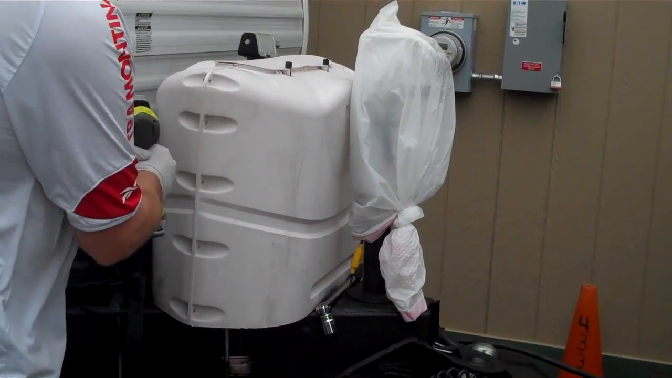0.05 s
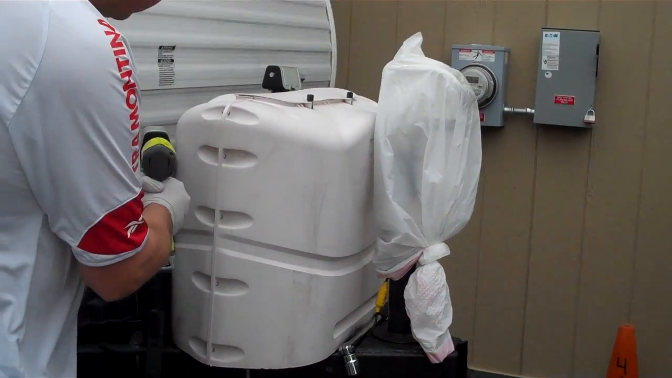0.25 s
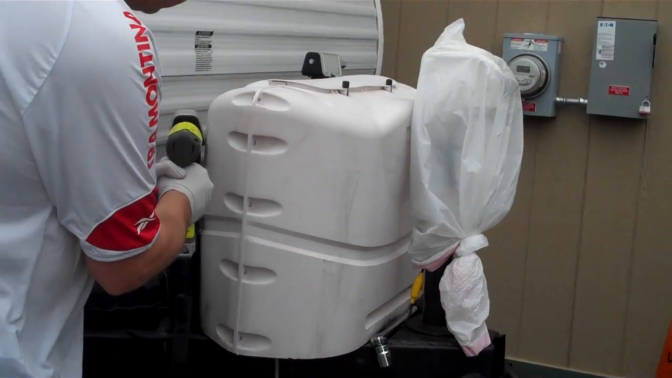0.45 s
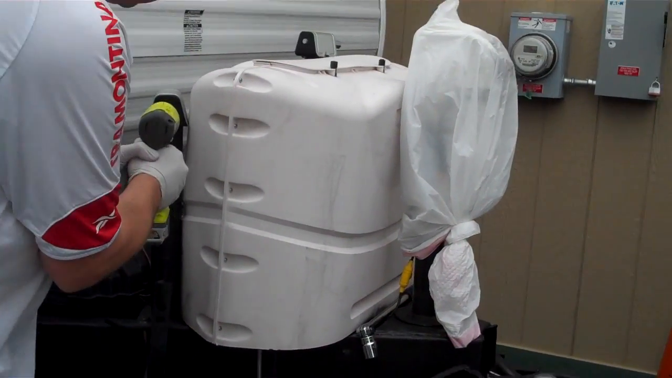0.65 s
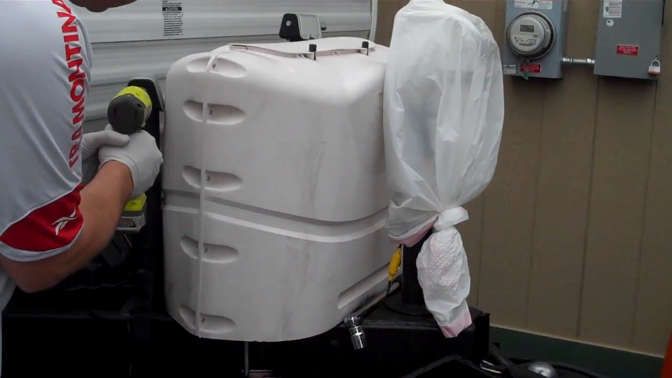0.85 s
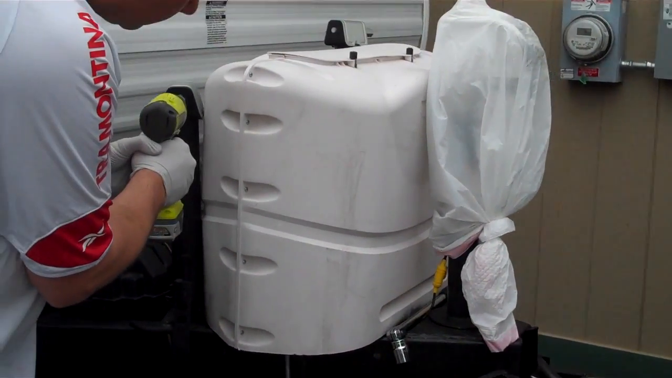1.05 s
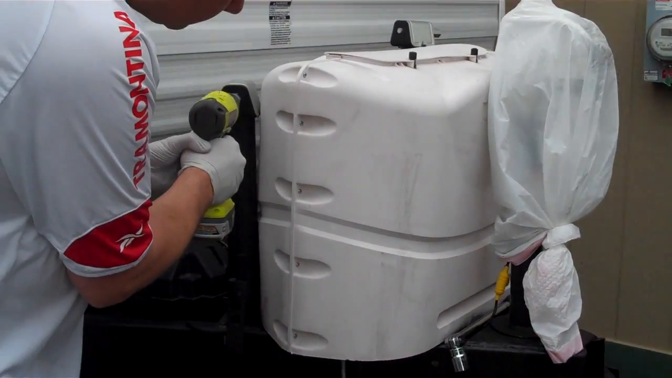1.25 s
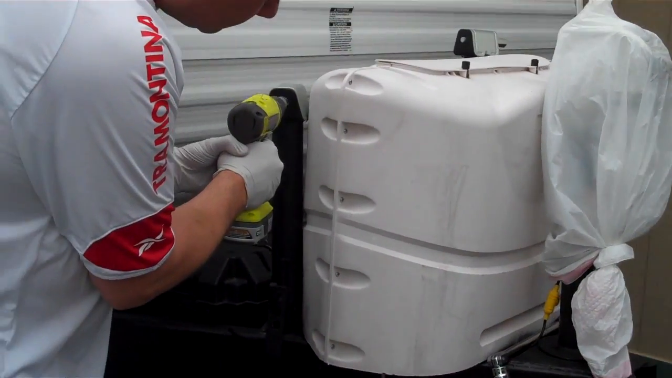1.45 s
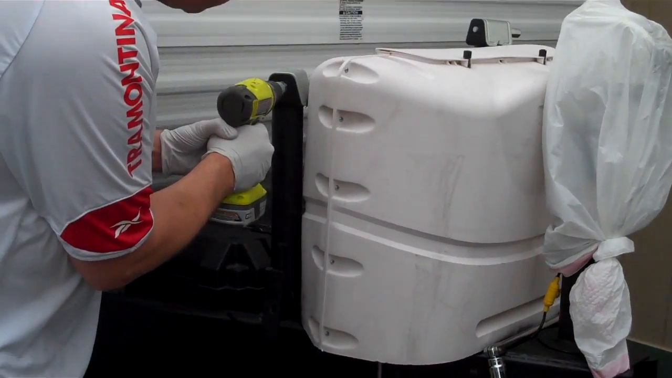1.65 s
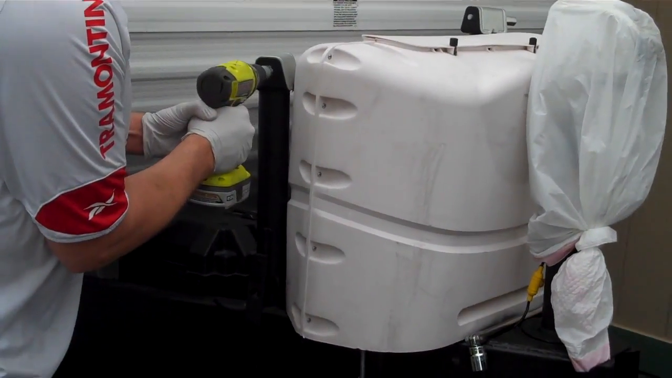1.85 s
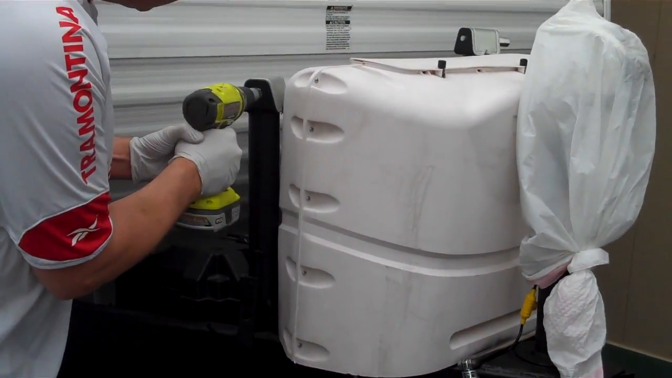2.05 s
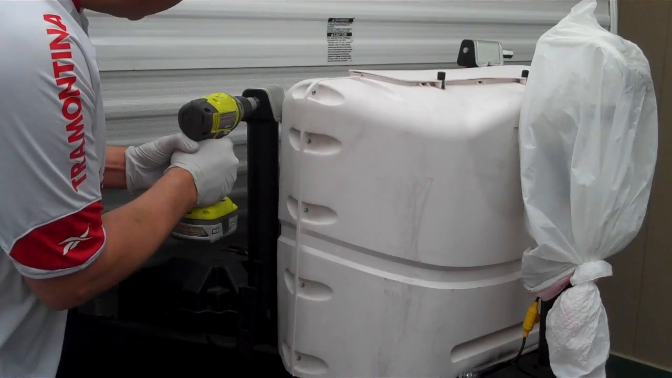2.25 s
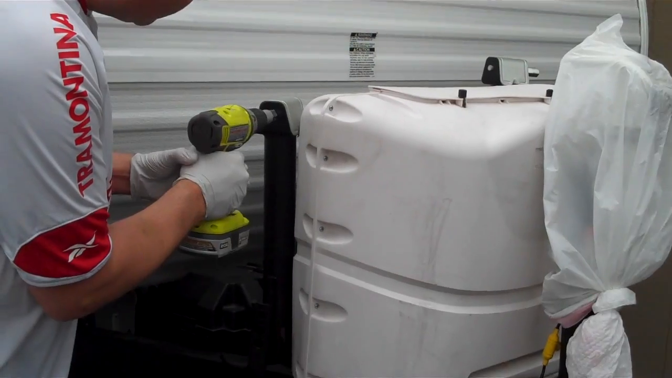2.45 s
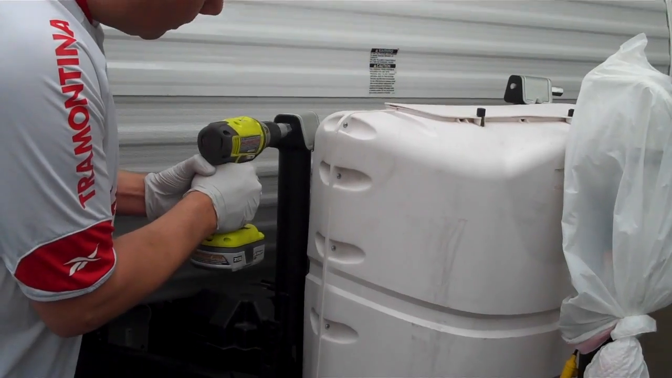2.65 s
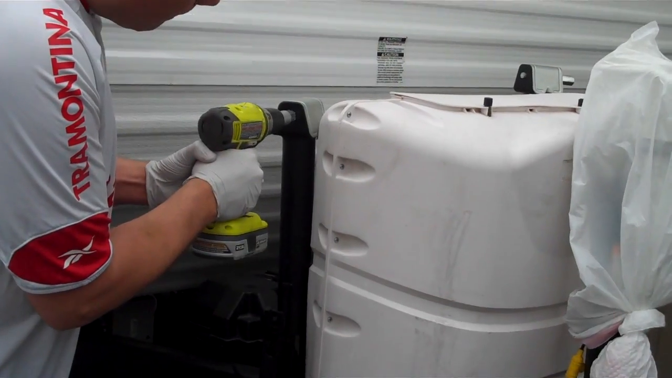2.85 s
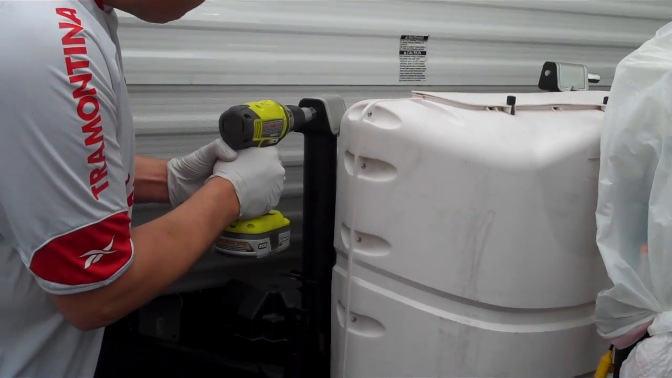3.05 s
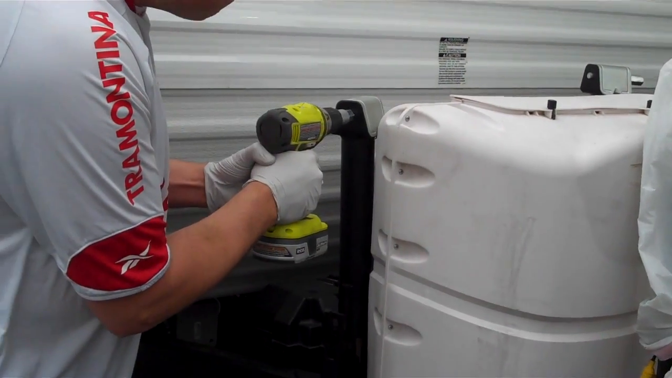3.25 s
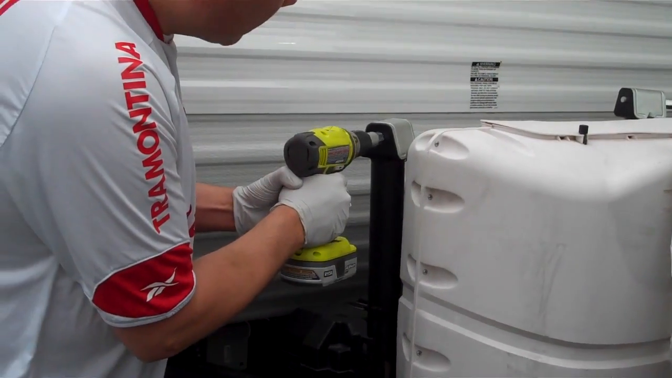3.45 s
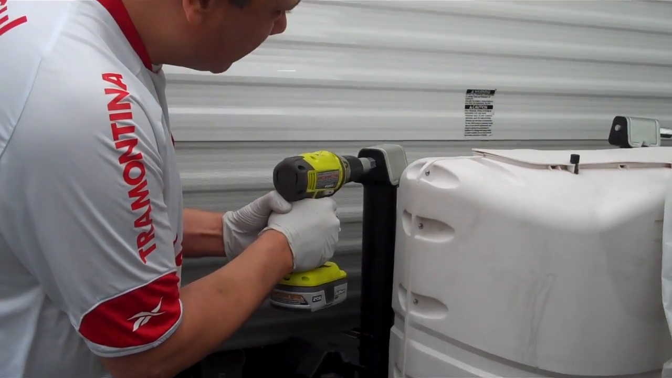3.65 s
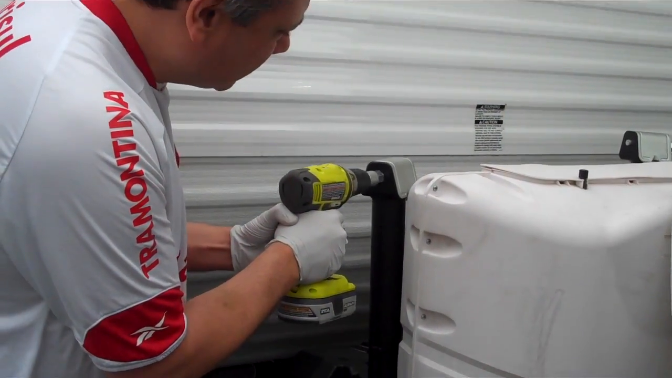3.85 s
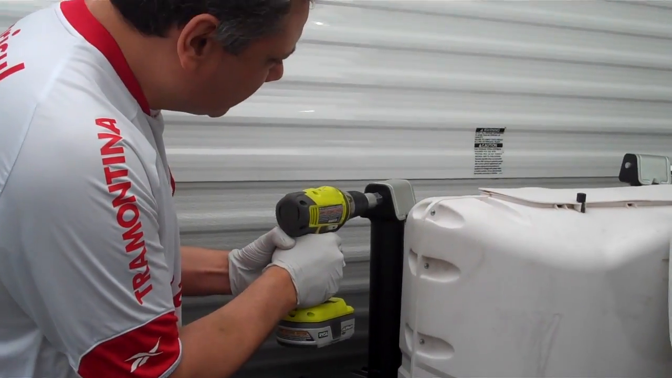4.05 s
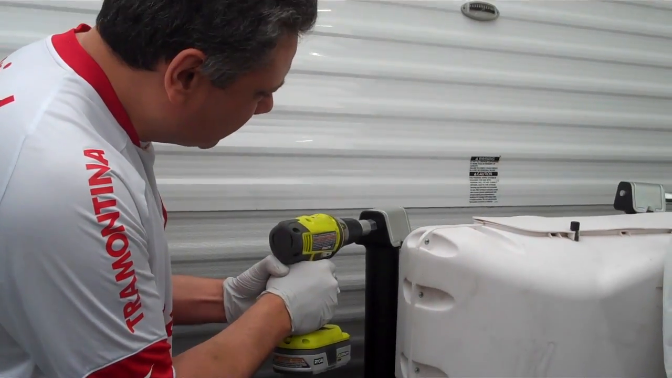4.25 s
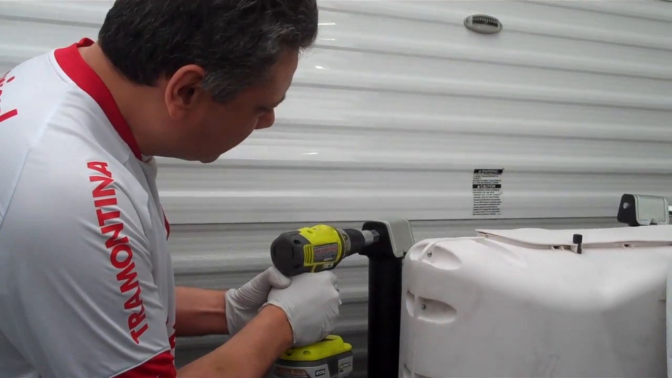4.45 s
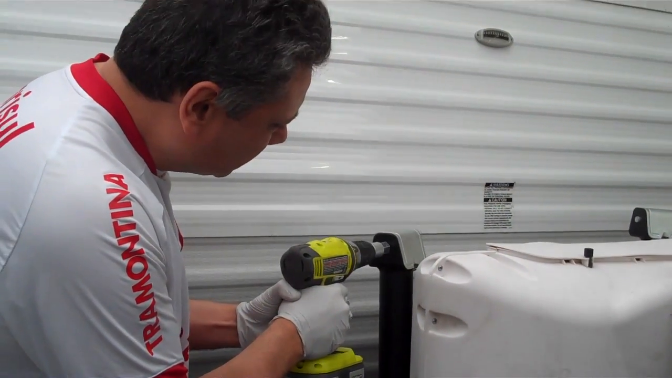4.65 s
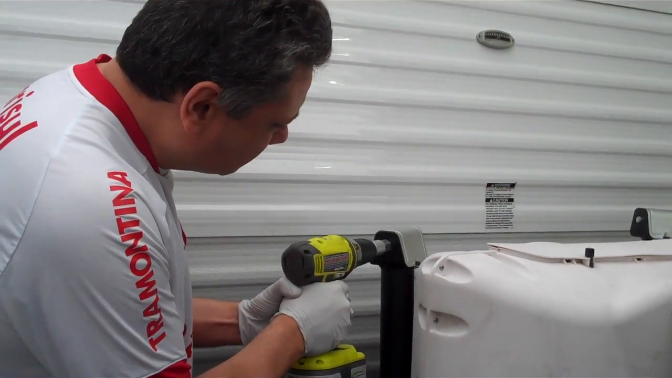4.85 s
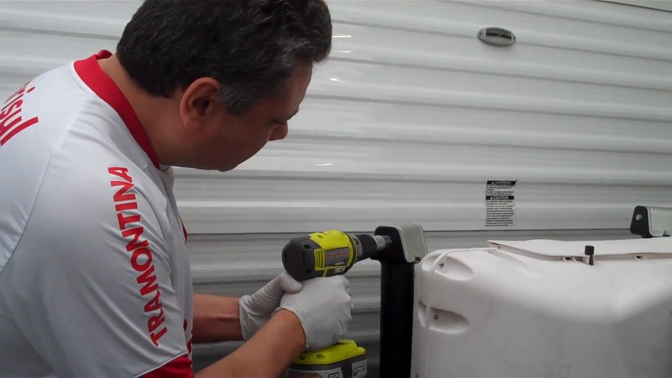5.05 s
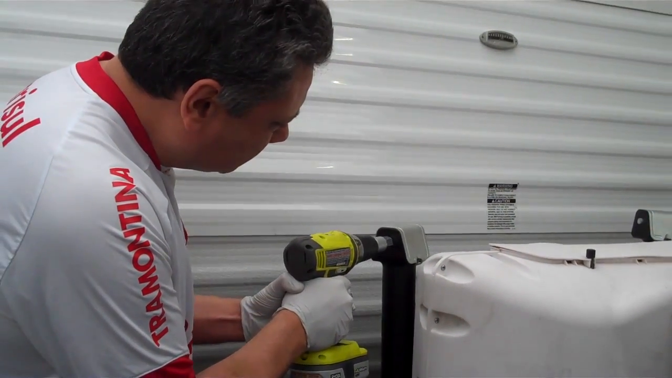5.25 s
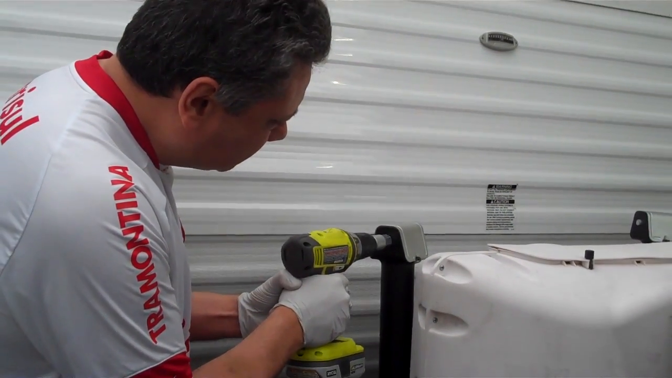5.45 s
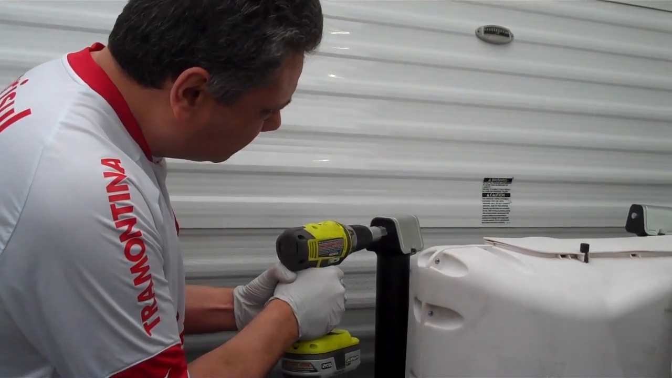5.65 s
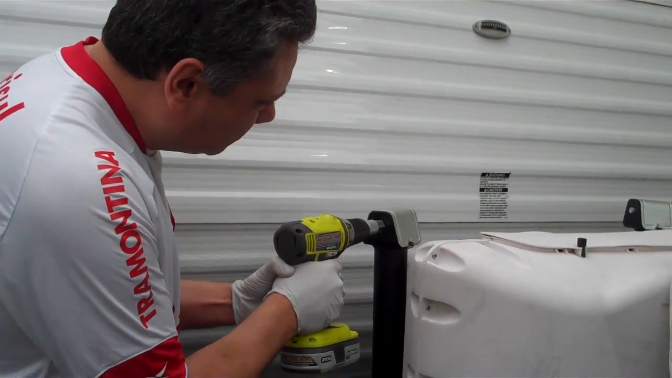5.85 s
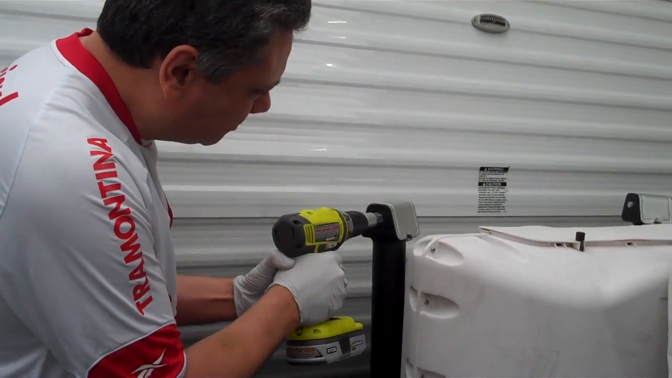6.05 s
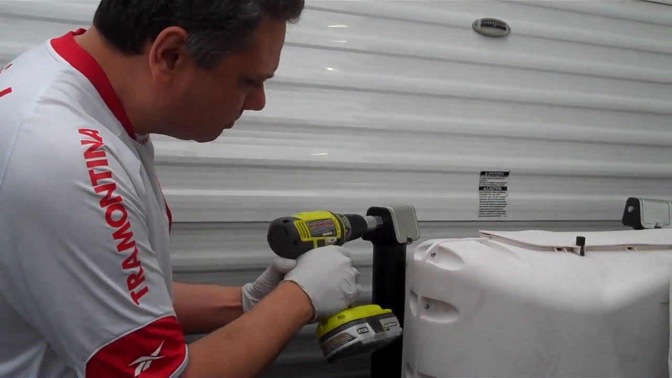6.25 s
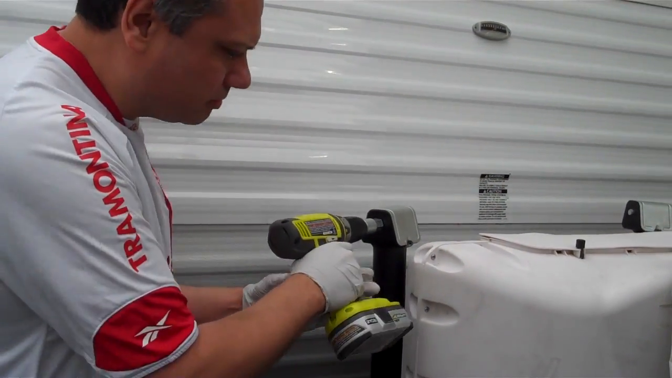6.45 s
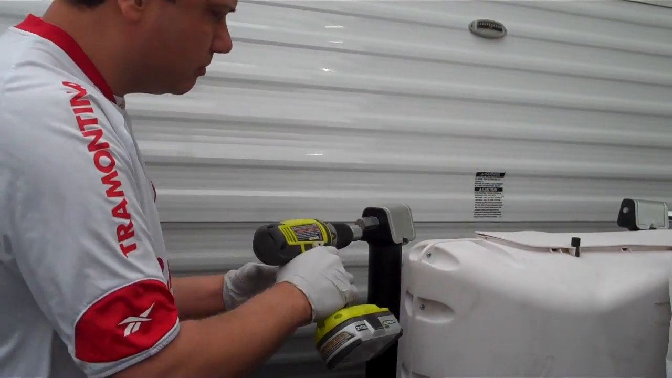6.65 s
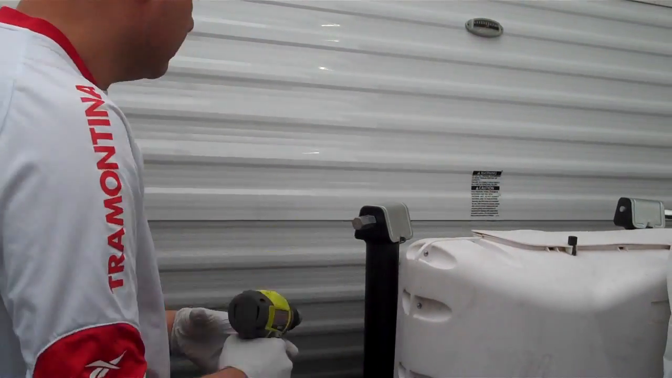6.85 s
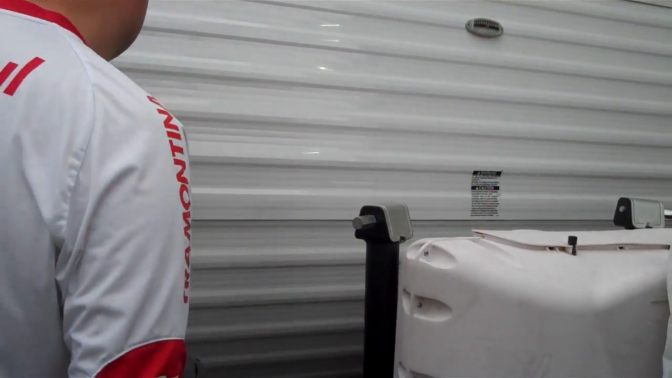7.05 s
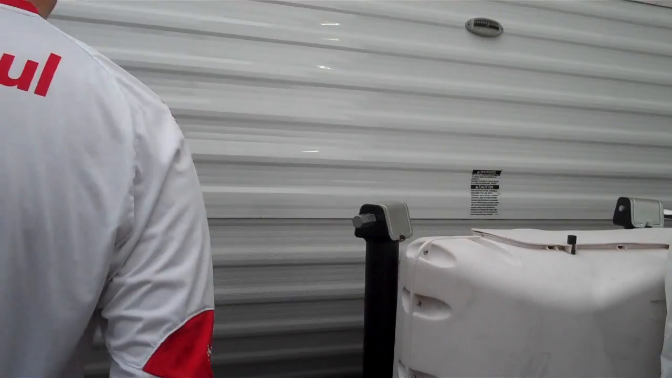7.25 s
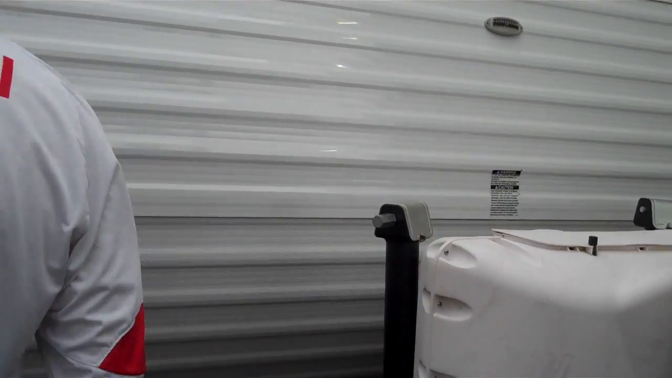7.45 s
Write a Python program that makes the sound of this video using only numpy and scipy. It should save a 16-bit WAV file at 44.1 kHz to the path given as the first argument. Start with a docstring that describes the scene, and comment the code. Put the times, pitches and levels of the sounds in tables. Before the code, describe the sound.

Outdoors, a cordless drill winds a rattling trailer jack, its high whine sinking under load before it cuts off and the socket clinks free.

```python
"""Cordless drill winding a trailer jack

Outdoors, close to a house wall, with a hand-held microphone. The drill spins up and whines freely while
the slack jack rattles. Then the jack takes the weight: the motor slows, sags once per crank turn, and the
planetary gears sing until the trigger is let go. The microphone is bumped, and the socket is worked off
with a few knocks. Feet shuffle on the ground, with air and traffic in the distance."""
import sys
import numpy as np
from scipy import signal
from scipy.fft import rfft, irfft
from scipy.io import wavfile

SR = 44100
rng = np.random.default_rng(int(sys.argv[2]) if len(sys.argv) > 2 else 0)


def pcm_store(signal):
    """Save signal as 16-bit PCM."""
    levels = np.round(np.clip(np.atleast_2d(signal), -1, 1) * 32767)
    wavfile.write(sys.argv[1], SR, levels.astype(np.int16).T)


N = 330750
TIME = np.arange(N) / SR
MESH_ORDER, ROTOR_ORDER = 11.25, 12  # beats per motor turn

# The teeth slam across their play. Each row: centre and half-width in seconds, full boost in dB.
TOOTH_SLAMS = [(.078, 0.007, 14), (.103, .008, 4), (5.222, 0.02, 8), (5.69, 0.027, 3.5),
               (6.445, 0.025, 5.5)]


def drill():
    """Tones locked to the motor shaft and the clatter of gears and jack, started and cut by the trigger."""
    # Gear torque, first inertia, later the trailer's weight. Each row: time in seconds, share of 1.
    torque = [(.08, 0.35), (.18, 0.05), (3.7, 0.04), (4.7, 0.35)]
    load = curve(torque)
    speed, strain, bind = motor()
    judder = (.0008 + .003 * strain ** 3) * wander(25) + .0006 * wander(5)
    turns = np.cumsum(speed * (1 + judder)) / SR
    tones = motor_whine(turns) + gear_mesh(turns, speed, load, strain, bind) + shaft_tones(turns, load)
    singing = np.minimum(speed / 151, 1) ** 3  # tones die away below 151 turns a second
    carrier_pressure = undb(.5 * np.sin(2 * np.pi * turns / 4) + .5 * wander(19))  # swings once a round
    clatter = teeth(MESH_ORDER * turns, count=45, wear=.39, scatter_db=2, sliding=1) * carrier_pressure
    rattle = gearbox_hiss(clatter, turns, load, strain) + housing_growl(clatter, strain)
    slack = teeth(2.73 * turns, count=45, wear=.43, scatter_db=-.5, sliding=.99) * undb(.52 * wander(40))
    rattle += jack_rattle(slack, strain) + metal_rings(slack) + housing_chirps() + gear_churn(slack, strain)
    # So small a body radiates no bass.
    rattle = signal.sosfilt(signal.butter(4, 150, "high", fs=SR, output="sos"), rattle)
    attack_s, cut_s, cut_db_per_s = .0027, 6.461, 417
    trigger = (1 - np.exp(-TIME / attack_s)) * undb(-cut_db_per_s * np.maximum(TIME - cut_s, 0))
    return (tones * singing + rattle) * trigger


def motor():
    """Turns per second, strain (0 free, 1 labouring) and how hard the crank binds, once each turn."""
    # Speed before run-up, sag and braking. Each row: time in seconds, turns per second.
    cruise_speeds = [(0, 286.5), (.37, 301.5), (.6, 310), (.76, 318.5), (.97, 314.8), (1.2, 317.5),
                     (1.45, 316.7), (1.55, 320.3), (2.3, 321), (2.6, 318.2), (3.2, 317.7), (3.64, 313),
                     (4, 316.8), (4.15, 310.2), (4.3, 297.7), (4.55, 277), (4.63, 273), (4.73, 265),
                     (4.85, 261), (4.94, 255), (5.19, 244), (5.24, 238), (5.35, 233), (5.49, 228),
                     (5.55, 223), (5.72, 219), (6.04, 206), (6.17, 203), (6.39, 188.5), (6.45, 177.5)]
    turns_per_crank, tight_spot_s, sag_hz = 52.56, 5.227, 11
    drag_s, drag_hz, release_s, brake_s = .275, 6, 6.447, .06
    cruise = curve(cruise_speeds)
    strain = np.clip((np.maximum.accumulate(cruise) - cruise) / 120, 0, 1)  # speed lost from the top
    crank = np.cumsum(cruise) / SR / turns_per_crank
    crank -= np.interp(tight_spot_s, TIME, crank)
    bind = strain * (.5 + .5 * np.cos(2 * np.pi * crank)) ** 3.1
    # The socket sits askew and drags once a crank turn until it seats.
    askew = np.exp(-TIME / .7) * np.cos(2 * np.pi * (crank - np.interp(drag_s, TIME, crank)))
    spin_up = 1 - .68 * np.exp(-TIME / .055)
    brake = np.clip(1 - (TIME - release_s) / brake_s, 0, 1)
    return (cruise * spin_up - sag_hz * bind - drag_hz * askew) * brake, strain, bind


def motor_whine(turns):
    """The rotor whines at twelve beats a turn."""
    # The whine's loudness. Each row: time in seconds, level in dB.
    levels = [(0, -43), (.45, -37), (.6, -36), (.9, -38), (1, -30), (1.08, -33), (1.27, -32), (1.53, -28.5),
              (1.66, -33), (1.94, -36), (2.02, -33), (2.48, -33), (2.8, -31), (3.1, -32), (3.36, -36.5),
              (3.46, -44), (3.62, -40), (4.15, -40.5), (4.4, -46), (4.6, -52)]
    gain = undb(curve(levels) + .3 * wander(6))
    return gain * tone(ROTOR_ORDER * turns, flutter=.1, grit=.036, grit_hz=150)


def gear_mesh(turns, speed, load, strain, bind):
    """Meshing teeth sing; the tone and its squealing octave swell as they cross housing resonances."""
    # How strongly the housing radiates a tone. Each row: pitch in Hz, gain in dB.
    housing = [(1300, -54), (1950, -43), (2090, -31), (2330, -32), (2430, -34), (2530, -30.5),
               (2630, -33.5), (2750, -28.5), (2900, -23.5), (3050, -26), (3180, -28), (3270, -36.5),
               (3450, -32.5), (3555, -36), (3610, -45), (3720, -31), (4250, -32), (4400, -29), (5000, -31),
               (5300, -29.5), (5550, -40.5), (5900, -44.5), (6400, -50), (7000, -57)]
    # The tone swells and sinks as teeth shift. Each row: centre and half-width in seconds, change in dB.
    tooth_shifts = [(.01, .03, -12), (.14, .03, -2.5), (1, .1, -4), (3.85, .1, -7), (4.47, .09, -2),
                    (4.83, .06, 2), (5.05, .03, 3), (5.17, .03, 2), (5.43, .03, 4), (5.52, .03, 4.5),
                    (5.6, .04, -4), (5.94, .05, 2.5), (6.21, .06, -5), (6.37, .06, 4)]
    # The squeal falters. Each row: centre and half-width in seconds, change in dB.
    squeal_gaps = [(5.285, 0.023, -5), (5.39, 0.01, -6), (5.51, .05, -4.5), (6.012, 0.012, -7),
                   (6.31, .012, -3), (6.385, .025, -3)]
    mesh, mesh_hz = MESH_ORDER * turns, MESH_ORDER * speed
    housing_hz, housing_db = np.transpose(housing)
    slam_db = swells(TOOTH_SLAMS)
    mesh_db = np.interp(mesh_hz, housing_hz, housing_db) - 7.5 * (1 - load) + 3 * bind
    mesh_db += (1 - strain) * slam_db + swells(tooth_shifts)
    # The octave fades unless the motor labours or is just starting.
    ease = (1 - strain) * (1 - .6 * np.exp(-(TIME / .046) ** 4))
    octave_db = np.interp(2 * mesh_hz, housing_hz, housing_db) - 20 * ease ** 3 - 3.5 * bind
    octave_db += strain * slam_db + swells(squeal_gaps)
    chatter = .12 + .7 * np.exp(-TIME / .072)
    fundamental = tone(mesh, flutter=.14, grit=chatter, grit_hz=259)
    sideband = tone(mesh + turns, flutter=.56, grit=.27, grit_hz=120)
    octave = tone(2 * mesh, flutter=.28, grit=.33 + .17 * strain ** 3, grit_hz=280)
    rasp = tone(3 * mesh, flutter=.63, grit=.42, grit_hz=320)
    return (undb(mesh_db + 2.2 - strain ** 2) * fundamental
            + undb(-29) * load * np.sqrt(1 - strain) * sideband
            + undb(octave_db + 1.5) * octave
            + undb(mesh_db - 19.5) * rasp)


def shaft_tones(turns, load):
    """The slower gear stage hums under the lesser tones of rotor and gears."""
    # The slow stage's hum. Each row: time in seconds, relative level in dB.
    hum_levels = [(0, -56), (1.3, -67.5), (4.2, -67.5), (4.5, -63.5), (5.44, -64), (5.52, -84)]
    # Lesser tones. Each row: multiple of motor speed, relative dB running free and at full load.
    orders = [(1, -57, -90), (1.995, -49, -84), (2.717, -48.5, -78), (2.983, -51, -80), (3.995, -45, -67),
              (4.97, -47.5, -60), (7.97, -45.5, -82), (13.55, -48, -50), (14.15, -51, -52)]
    spin_up_db = -14 * np.exp(-TIME / .42)  # unbalance is heard only at full speed
    hum_gain = undb(curve(hum_levels) + spin_up_db + 3.2 * wander(7.5))
    out = hum_gain * tone(2 * turns / 3, flutter=.28, grit=.06, grit_hz=60)
    smear_radians = .3 + 2 * load  # loaded gears judder, so their tones turn to a grind
    for order, free_db, loaded_db in orders:
        db = (1 - load) * (free_db + spin_up_db) + load * loaded_db + 3 * wander(3.9) - 4
        out += np.sqrt(2) * undb(db) * np.sin(2 * np.pi * order * turns + smear_radians * wander(28.5))
    return out


def gearbox_hiss(clatter, turns, load, strain):
    """Tooth clatter hisses through the gearbox, changing colour with load; the rotor rings the shell."""
    # The gearbox's colour, free and loaded. Each row: frequency in Hz, gain in dB.
    free_colour = [(700, -14), (1600, 3), (2150, 5.5), (2900, 4.5), (3400, 3), (4500, 4), (5700, 0.5),
                   (6400, 2), (7300, 2.5), (9200, 2.5), (10500, -3), (12000, -3.5), (13000, -8.5),
                   (14500, -3)]
    loaded_colour = [(170, -55), (400, -9), (520, -16), (700, -1), (1650, -41), (2050, -8), (3100, 14),
                     (3650, 1), (4500, 7), (5700, 9), (6500, -3.5), (8100, 3.5), (9200, -5), (10500, -1),
                     (12000, -4.5), (13000, -21), (14500, 2)]
    # Narrow notes of the drill's shell. Each row: pitch and width in Hz, gain in dB.
    shell_modes = [(2275, 44, 11), (2930, 280, 2.5), (4420, 60, 3), (4620, 50, 3), (5090, 90, 5)]
    hiss = np.sqrt(1 - load) * unit(colour(clatter, free_colour))
    hiss += np.sqrt(load) * unit(colour(clatter, loaded_colour))
    rotor_ticks = teeth(ROTOR_ORDER * turns, count=12, wear=.3, scatter_db=2, sliding=.7)
    hiss += undb(-10) * unit(ring(rotor_ticks, shell_modes))
    run_in_db = -2.5 * np.exp(-(TIME / 2.05) ** 2)
    slam_db = .39 * strain * swells(TOOTH_SLAMS)
    return hiss * undb(-30.5 - 2.5 * np.sqrt(strain) * load + slam_db + run_in_db)


def housing_growl(clatter, strain):
    """As the mesh slows it nears the housing's own note and sets it growling."""
    note = ring(clatter, [(2005, 140, 28), (2190, 360, -37)])
    growl = colour(note, [(1200, -101), (1900, -3.5), (2700, -4), (4000, 0)])
    return unit(growl) * undb(-51 + 12.5 * strain)


def gear_churn(slack, strain):
    """The gears churn unevenly in one broad note that fades as the motor labours."""
    # The gearbox's broad resonance. Each row: pitch and width in Hz, gain in dB.
    mode = [(2270, 770, 0)]
    return unit(ring(ring(slack, mode), mode)) * (1 - strain) ** 2 * undb(-45.5 + 2.8 * wander(16))


def jack_rattle(slack, strain):
    """The slack jack rattles, and quietens as it takes the weight."""
    # The steel jack and trailer tongue. Each row: pitch and width in Hz, gain in dB.
    jack_modes = [(202, 41, -7), (350, 137, -3), (481, 93, -5), (752, 22, 2), (838, 92, 2.5), (986, 220, 5),
                  (1230, 150, 7), (1410, 140, 2), (1660, 270, -3)]
    # The drill rocks on the crank. Each row: centre and half-width in seconds, boost in dB.
    jolts = [(.23, 0.031, 2.5), (.34, 0.016, 6), (.8, 0.28, 3.5), (1.05, 0.048, 4), (1.82, 0.32, 4.5),
             (3.68, 0.025, 2)]
    steel = colour(ring(slack, jack_modes), [(60, -57), (170, -3), (1700, -1.5), (3500, -2)])
    return unit(steel) * undb(-39.5 - 8 * strain + swells(jolts) + .89 * wander(32))


def metal_rings(slack):
    """Clatter keeps narrow notes of gearbox and jack ringing; they come and go as the drill shifts."""
    # Each row: start and end in seconds, pitch and filter width in Hz, level in dB.
    notes = [(.05, .8, 7680, 250, -50), (.55, 1.5, 2170, 300, -43), (.85, 1.55, 7470, 280, -48.5),
             (1.55, 2.5, 320, 60, -58), (1.6, 2.5, 4800, 70, -45.5), (1.75, 3.1, 8950, 450, -45),
             (2.1, 2.9, 9600, 400, -50), (2.2, 4.4, 7230, 280, -48.5), (2.6, 4.3, 1310, 200, -49),
             (3.3, 4.2, 4480, 160, -44.5), (3.3, 4, 5750, 300, -48), (4.2, 5.45, 3080, 330, -39.5),
             (4.2, 5.1, 385, 150, -61), (4.2, 5.2, 1410, 190, -49.5), (4.6, 5, 720, 60, -57.5),
             (4.75, 5.4, 8170, 400, -45.5), (5.2, 5.6, 10550, 400, -51), (5.6, 6.45, 8900, 450, -48)]
    out, fade_s = np.zeros(N), .094
    for start, end, hz, width, db in notes:
        mode = [(hz, width, 0)]
        held = np.clip(np.minimum(TIME - start, end - TIME) / fade_s + .5, 0, 1)
        out += unit(ring(ring(slack, mode), mode)) * held * undb(db + 1.5 * wander(5.4))
    return out


def housing_chirps():
    """The gearbox housing chirps briefly with short, rough ringing."""
    # Each row: centre and half-width in seconds, pitch in Hz, level in dB.
    squeaks = [(.223, .007, 11000, -34), (.264, .008, 9550, -40), (1.005, .018, 2320, -36),
               (1.157, .009, 2280, -32), (2.396, .008, 2150, -32)]
    return sum(undb(db) * bell(at, half_width) * tone(hz * TIME, flutter=.1, grit=.33, grit_hz=200)
               for at, half_width, hz, db in squeaks)


def socket_removal():
    """Short blows ring the socket and thud in the jack; the socket scrapes as it slides off."""
    # Blows. Each row: start in seconds, level in dB, the jack's thud in relative dB, treble cutoff in Hz.
    knocks = [(6.7976, -43, 3, 5000), (6.8219, -39, 27, 5500), (6.834, -49, -6, 5000),
              (6.855, -49, 17, 4000), (6.9466, -33, 15, 4500), (6.979, -46.5, -12, 4000),
              (6.998, -42, -19, 6000), (7.01, -28.5, -30, 5200), (7.0132, -42, -17, 5000),
              (7.022, -43, -23, 4460), (7.042, -47, -12, 3500), (7.0813, -55, -16, 3500),
              (7.144, -50.5, -18, 7000), (7.154, -50, -18, 7000), (7.213, -59, -16, 5500),
              (7.267, -55, -12, 3500)]
    # Slides on the crank stub. Each row: start and length in seconds, level in dB.
    slides = [(6.799, 0.032, -44), (6.981, 0.043, -48), (7.133, .015, -58)]
    # Socket with chuck, and the jack's tube. Each row: pitch and width in Hz, gain in dB.
    socket_modes = [(1200, 200, 0), (1480, 190, 6), (1770, 170, 7.5), (2200, 230, 3.5), (2650, 260, 3.5),
                    (3150, 230, -1), (3830, 260, 0), (5100, 700, -11), (6600, 1200, -20),
                    (11000, 3000, -22)]
    tube_modes = [(332, 97, -13), (478, 86, 1), (620, 200, -2), (950, 160, 2), (1210, 240, 2)]
    out, t = np.zeros(N), TIME[:SR // 8]
    for at, db, thud_db, cutoff_hz in knocks:
        buzz = 1.1 * np.exp(-t / .002) + .16 * np.exp(-t / .016)  # loose parts
        push = .075 * rng.standard_normal(len(t)) * buzz
        push[0] += .7  # one clean contact
        blow = ring(push, socket_modes) + undb(thud_db) * ring(push, tube_modes)
        add(out, at, soften(blow, cutoff_hz), db)
    grains = rng.standard_normal(N) * undb(1.6 * wander(350))
    scrape = unit(ring(grains, socket_modes) + undb(-2) * ring(grains, tube_modes))
    sliding = np.zeros(N)
    for at, length, db in slides:
        attack = np.clip((TIME - at) / .0094, 0, 1)
        release = np.exp(-np.maximum(TIME - at - length, 0) / .041)
        sliding += undb(db) * attack * release
    return out + soften(scrape * sliding, 14000)


def crank_clonks():
    """The turning crank strikes inside the jack's head, with a low boom."""
    # Each row: start in seconds, level in dB, boom in relative dB.
    clonks = [(0.925, -37.5, -8), (1.037, -29, -2), (1.05, -35, 2), (1.062, -38, 0), (3.672, -38, 6)]
    # The jack's head and its boom. Each row: pitch and width in Hz, gain in dB.
    head_modes = [(915, 29, 15), (980, 65, 3)]
    boom_modes = [(165, 28, -8), (267, 78, -5), (417, 55, 4)]
    out, push = np.zeros(N), np.exp(-TIME[:SR // 8] / .00012)
    for at, db, boom_db in clonks:
        clonk = ring(push, head_modes) + undb(boom_db) * ring(push, boom_modes)
        add(out, at, soften(clonk, 1500), db)
    return out


def steps_and_bumps():
    """Dull low thumps: footsteps, and bumps of the hand-held microphone as the drill stops."""
    # Each row: start in seconds, level in dB, pitch in Hz.
    thumps = [(0.246, -44, 125), (0.286, -43, 190), (0.436, -41, 145), (0.917, -40.5, 203),
              (1.32, -47, 136), (1.76, -47, 170), (1.992, -43.5, 145), (6.499, -56, 95.5),
              (6.561, -53, 110), (6.615, -58, 125), (6.645, -53, 145), (7.287, -49, 131), (7.435, -54, 120)]
    out, t = np.zeros(N), TIME[:SR // 4]
    for at, db, hz in thumps:
        push = rng.standard_normal(len(t)) * (1 - np.exp(-t / .0056)) * np.exp(-t * hz / 1.8)
        mode = [(hz, 1.2 * hz, 0)]
        add(out, at, ring(ring(push, mode), mode), db)
    return out


def microphone_sway():
    """A deep soft push of air, there and back, whenever the hand swings the microphone."""
    # Each row: centre and half-width in seconds, relative level in dB.
    sways = [(6.184, .04, -50), (6.579, 0.038, -40.5), (6.62, 0.034, -53)]
    return sum(undb(db) * 2 * (TIME - at) / half_width * bell(at, half_width)
               for at, half_width, db in sways)


def yard(x, early_db, tail_db, t60_low, t60_high):
    """The trailer's front throws the sound straight back; the walls around keep a faint dull tail."""
    t = TIME[:SR]
    early = rng.standard_normal(SR) * np.exp(-t / .019) * (t > .003)
    noise = rng.standard_normal(SR)
    low = soften(noise, 3500)
    tail = (low * undb(-60 * t / t60_low) + .5 * (noise - low) * undb(-60 * t / t60_high)) * (t > .012)
    echo = undb(early_db) * early / np.linalg.norm(early) + undb(tail_db) * tail / np.linalg.norm(tail)
    return x + signal.fftconvolve(x, echo)[:N]


def distant_air():
    """Air and traffic far from the microphone: a dull, slowly drifting wash."""
    # Each row: frequency in Hz, gain in dB.
    air_colour = [(25, 0.5), (70, -5), (130, -4.5), (300, -3.5), (700, -1), (1400, -0.5), (3000, -7),
                  (6000, -16), (10000, -17.5), (14000, -27)]
    drift_db = curve([(0, 12.5), (2, 9), (3.5, 7), (6.2, 0), (6.55, 7), (7.5, -1.5)])
    return unit(colour(rng.standard_normal(N), air_colour)) * undb(-60.5 + drift_db + 1.7 * wander(1.1))


def tone(turns, flutter, grit, grit_hz):
    """A machine tone: it flutters slowly, and unequal teeth spread a rough skirt around it."""
    angle = 2 * np.pi * turns
    along = 1 + flutter * wander(23.5) + grit * wander(grit_hz)
    across = flutter * wander(32) + grit * wander(grit_hz)
    return np.sqrt(2) * (along * np.sin(angle) + across * np.cos(angle))


def teeth(turns, count, wear, scatter_db, sliding):
    """Each tooth lands with a force set by its own wear and by chance; the flanks rub in between."""
    tooth = np.floor(turns).astype(int)
    lands = np.diff(tooth, prepend=0)
    chance = np.clip(rng.standard_normal(N) * undb(scatter_db * rng.standard_normal(N)), -2, 2)
    force = wear * rng.standard_normal(count)[tooth % count] + chance
    return unit(lands * force) + sliding * rng.standard_normal(N)


def ring(x, modes):
    """Pass a push through (Hz, width in Hz, dB) resonances."""
    return sum(undb(db) * signal.lfilter(*signal.iirpeak(hz, hz / width, SR), x) for hz, width, db in modes)


def colour(x, points):
    """Shape a sound by (Hz, dB) points."""
    hz, db = np.transpose(points)
    bins = np.maximum(np.fft.rfftfreq(len(x), 1 / SR), 1)
    return irfft(rfft(x) * undb(np.interp(np.log(bins), np.log(hz), db)), len(x))


def soften(x, hz):
    """Roll off the treble above hz, as a soft contact does."""
    return signal.sosfilt(signal.butter(2, hz, fs=SR, output="sos"), x)


def wander(hz):
    """Smooth chance of spread 1 that moves up to hz times a second."""
    return unit(soften(rng.standard_normal(N), hz))


def curve(table):
    """Join (seconds, value) rows by straight lines."""
    return np.interp(TIME, *np.transpose(table))


def bell(at, half_width):
    """A smooth bump of height 1."""
    return np.exp(-((TIME - at) / half_width) ** 2)


def swells(table):
    """Smooth rises and dips in dB."""
    return sum(db * bell(at, half_width) for at, half_width, db in table)


def add(out, at, sound, db):
    """Mix in a short sound at a time; db is its energy spread over 10 ms."""
    start = int(at * SR)
    size = np.sqrt(np.sum(sound ** 2) / (SR // 100))
    out[start:start + len(sound)] += (undb(db) * sound / size)[:N - start]


def undb(db):
    return 10 ** (np.asarray(db) / 20)


def unit(x):
    return x / np.sqrt(np.mean(x ** 2))


def scene():
    """The nearby work and its echo over distant air, at one hand-held microphone."""
    air = distant_air()
    work = drill() + socket_removal() + crank_clonks() + steps_and_bumps()
    near = yard(work, early_db=-14, tail_db=-18.5, t60_low=.52, t60_high=.46)
    return (near + air + microphone_sway())[None]


def record(dry):
    """A steep low-pass cuts the top above 13.8 kHz."""
    return signal.sosfilt(signal.ellip(10, .2, 80, 13800, fs=SR, output="sos"), dry)


dry = scene()
out = record(dry)
pcm_store(out)
```